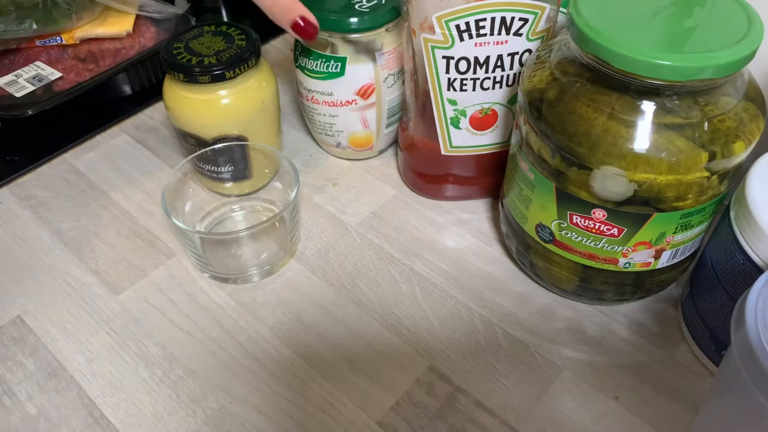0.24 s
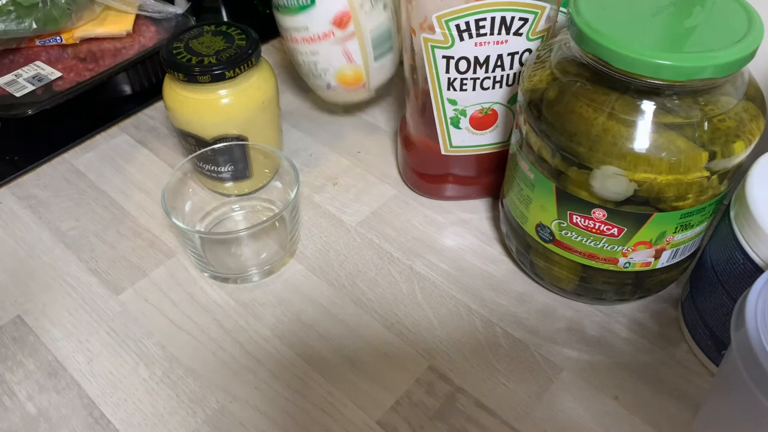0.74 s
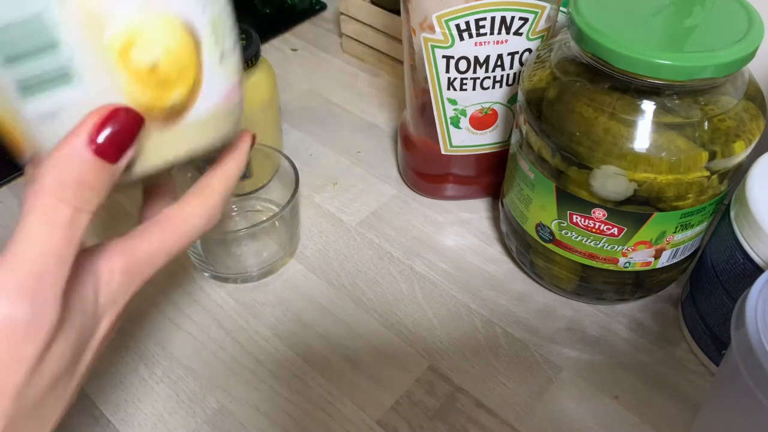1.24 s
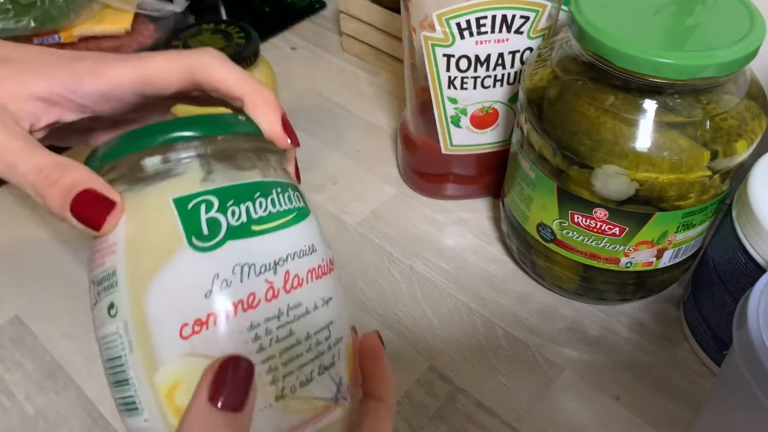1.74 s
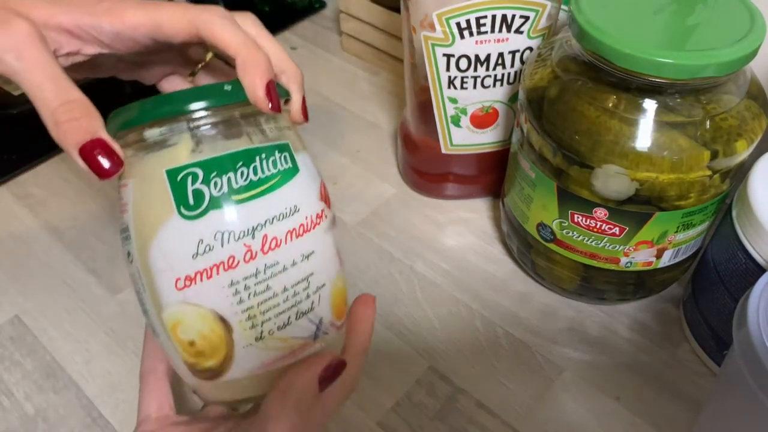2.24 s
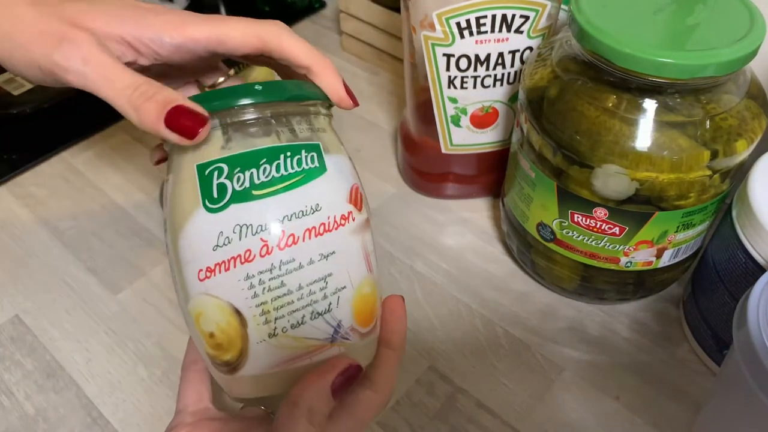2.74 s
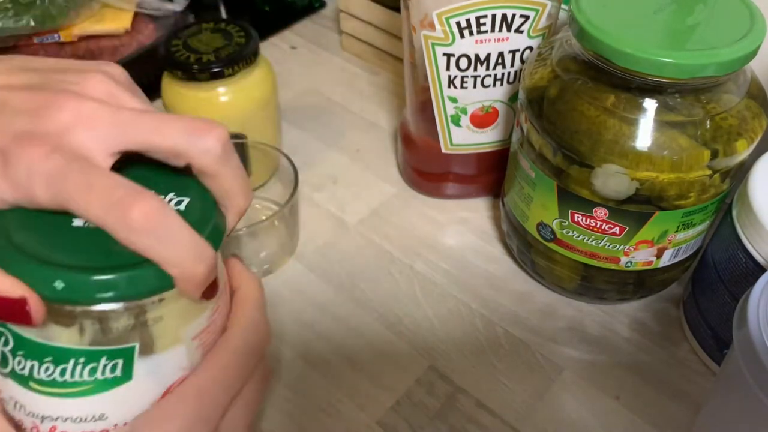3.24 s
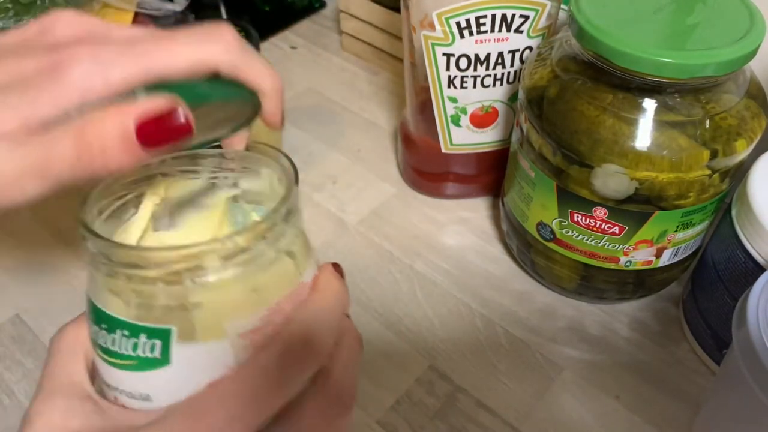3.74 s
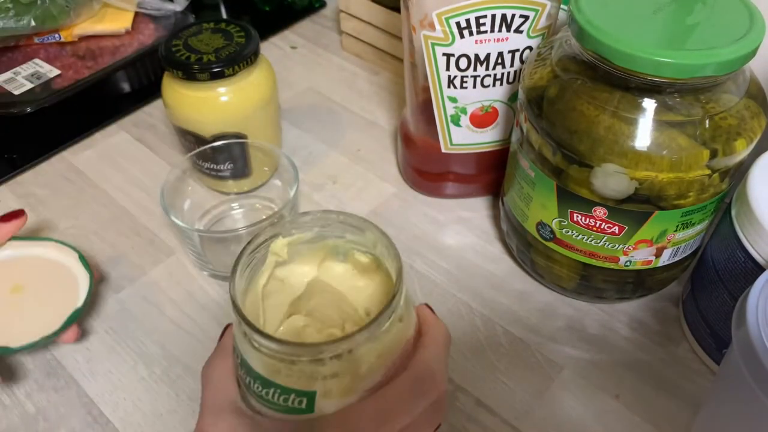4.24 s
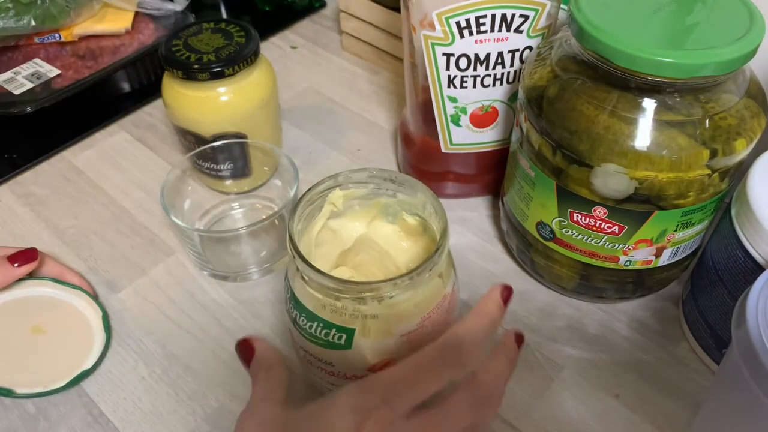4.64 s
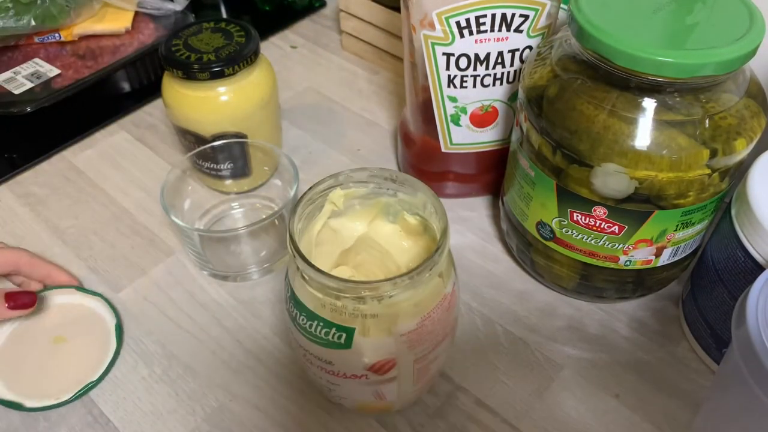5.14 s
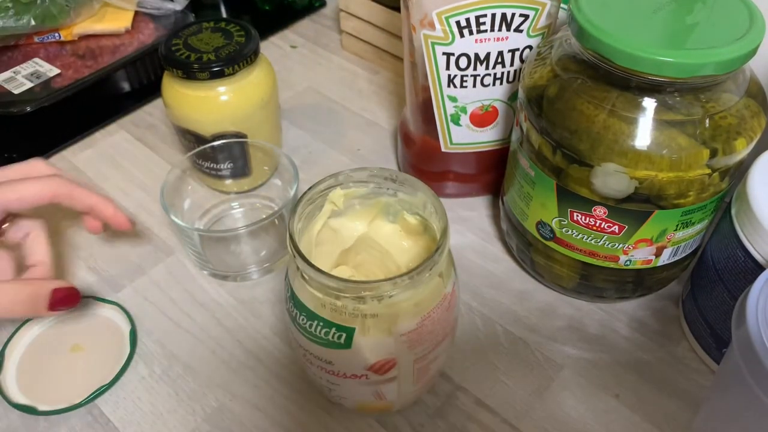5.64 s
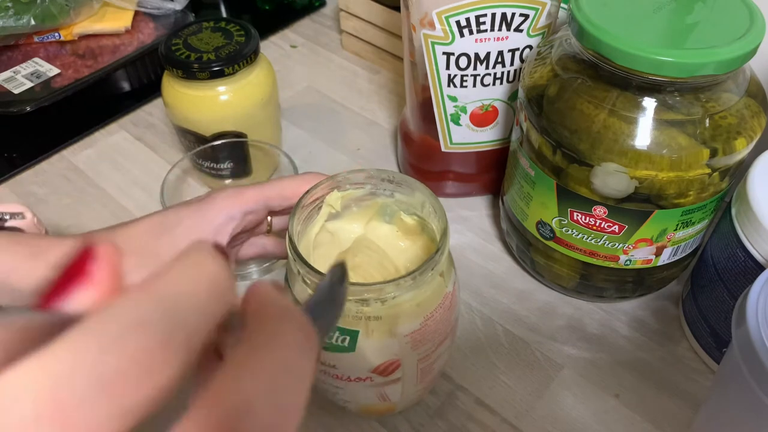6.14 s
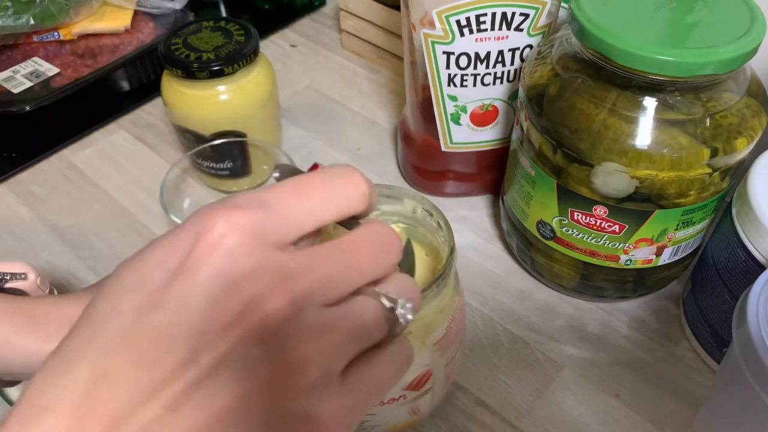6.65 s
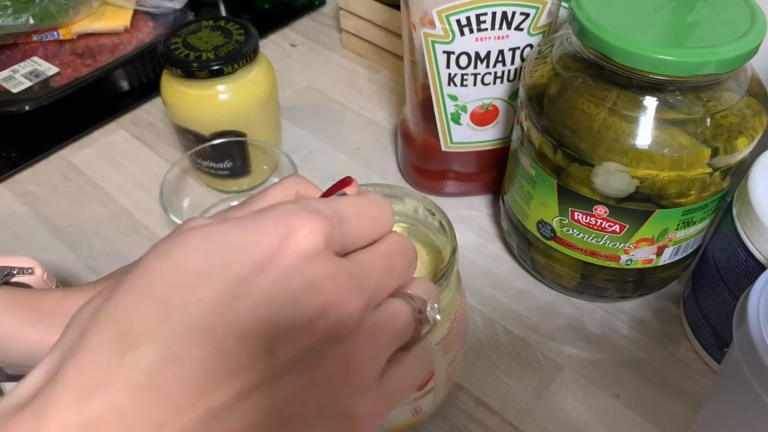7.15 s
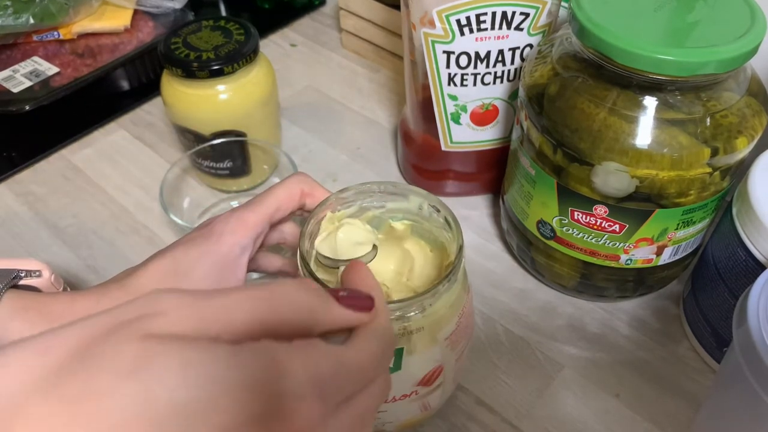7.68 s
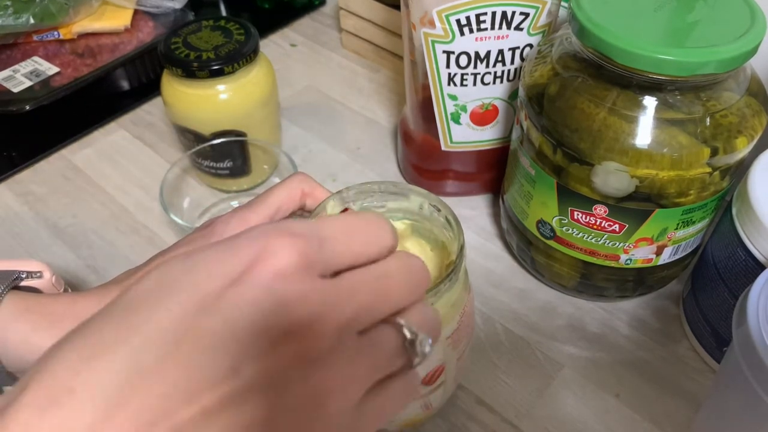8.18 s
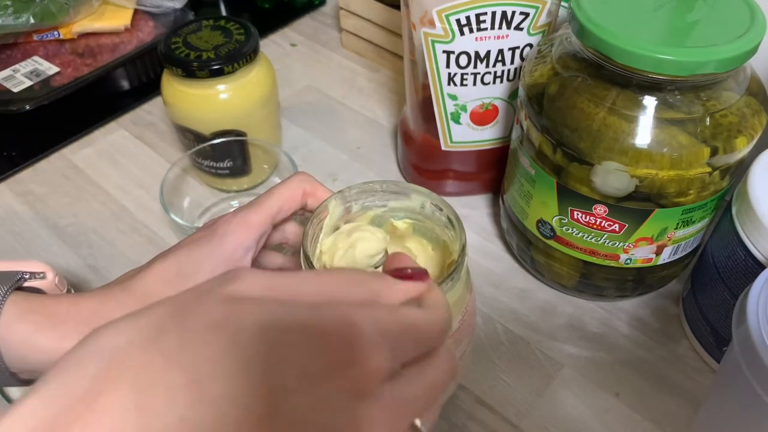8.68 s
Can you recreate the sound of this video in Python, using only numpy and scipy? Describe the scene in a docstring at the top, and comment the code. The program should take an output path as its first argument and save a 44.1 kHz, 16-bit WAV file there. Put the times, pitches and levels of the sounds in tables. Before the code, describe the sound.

In a quiet kitchen, nails tap glass, a metal lid snaps loose with a low pop, a heavy jar knocks down, and a spoon clinks.

```python
"""Over quiet dull room noise with faint low rumbles, fingernails tick on a closed glass jar and skin rubs glass
and lid: noise bursts with jar modes, and random slips. The lid pops open: snaps plus low decaying sines.
The jar knocks on the worktop and is dragged (board modes, stick-slip); the metal lid is laid down and pushed
aside (touches, rim scrape); the jar is dragged again. Last, a small spoon clinks on the glass: ticks plus
modes weighted by the place of contact."""
import sys
import numpy as np
from scipy import signal
from scipy.fft import rfft, irfft
from scipy.io import wavfile

SR = 44100
rng = np.random.default_rng(int(sys.argv[2]) if len(sys.argv) > 2 else 0)


def wav_out(sig):
    """Save sig, one row per channel (or a flat mono array), as 16-bit PCM at SR to the path in sys.argv[1]."""
    wavfile.write(sys.argv[1], SR, np.round(np.clip(np.atleast_2d(sig).T, -1, 1) * 32767).astype(np.int16))


N = 393151
TIME = np.arange(N) / SR
TAIL = TIME[:SR // 2]
# delay of the left channel
TREBLE_LAG_SAMPLES, WORKTOP_LAG_SAMPLES, SPOON_LAG_SAMPLES = 13, 5, 9


def amp(db):
    """Decibels to gain."""
    return 10 ** (np.asarray(db) / 20)


def unit(x):
    """Scale to an energy of one."""
    return x / np.sqrt(np.sum(x ** 2, axis=-1, keepdims=True) + 1e-20)


def at_hz(points, hz):
    """Read a curve on a log-frequency axis."""
    f, value = np.transpose(points)
    return np.interp(np.log(np.maximum(hz, 1)), np.log(f), value)


def through(x, response):
    """Convolve a sound with an impulse response."""
    return signal.oaconvolve(np.atleast_2d(x), np.atleast_2d(response), axes=1)[:, :x.shape[-1]]


def low_pass(x, hz, order=2):
    """Butterworth low-pass."""
    sos = signal.butter(order, hz, fs=SR, output="sos")
    return signal.sosfilt(sos, x + 1e-18)


def colour(spectrum, size=8192):
    """Causal impulse response of unit energy with the given spectrum shape, by folding the cepstrum."""
    level_db = at_hz(spectrum, np.fft.rfftfreq(size, 1 / SR))
    cepstrum = irfft(np.log(amp(level_db)))
    cepstrum[1:size // 2] *= 2
    cepstrum[size // 2 + 1:] = 0
    return unit(irfft(np.exp(rfft(cepstrum))))


def fade(t60_s):
    """Exponential decay, 60 dB down after t60."""
    return np.exp(-np.log(1000) * TAIL / t60_s)


def ringing(modes):
    """Damped sines of alternating sign, peak one."""
    out = np.zeros(len(TAIL))
    for k, (hz, db, t60_s) in enumerate(modes):
        out += (-1) ** k * amp(db) * fade(t60_s) * np.sin(2 * np.pi * hz * TAIL)
    return out / np.abs(out).max()


def shimmer(modes, split):
    """A nearly round body: each mode is split into close partials that beat; peak one."""
    partials = []
    for hz, db, t60_s in modes:
        for side in (-1, 0, 1):
            partial_hz = hz * (1 + split * (side + rng.uniform(-0.522, 0.55)))
            partial_db = db + rng.normal(0, 2) - 3 * abs(side)
            partials.append((partial_hz, partial_db, t60_s))
    return ringing(partials)


def build_up(tau_s):
    """Exponential approach to full level after contact."""
    return 1 - np.exp(-TAIL / tau_s)


def crack(response, t60_s, rise_tau_s):
    """A hard contact: a burst of dense vibration that builds up and quickly dies, peak about one."""
    burst = rng.standard_normal(len(TAIL)) * fade(t60_s) * build_up(rise_tau_s)
    return through(burst, response)[0] * 0.59


def add(track, s, sound):
    """Mix a sound into a track at a time."""
    start = round(s * SR)
    track[start:start + len(sound)] += sound[:N - start]


def freedom(db, rows, damping):
    """Light touches stay in contact and damp the ring; the hardest one bounces clear."""
    return amp(damping * (db - max(row[1] for row in rows)))


def blows(rows, spectrum, modes, *, crack_t60_s, rise_tau_s, ring_db, dull_hz):
    """Each blow is a crack plus the body's modes; fleshier contacts carry more of the low part."""
    out, response = np.zeros(N), colour(spectrum)
    for s, db, dull_db in rows:
        ring = freedom(db, rows, damping=0.27) * shimmer(modes, split=0.00678) * build_up(rise_tau_s)
        hit = crack(response, crack_t60_s, rise_tau_s) + amp(ring_db) * ring
        reweighted = hit + (amp(dull_db) - 1) * low_pass(hit, dull_hz, order=1)
        add(out, s, amp(db) * reweighted)
    return out


def slips(per_s, spread_db):
    """Friction: tiny random slips of uneven size, rms one."""
    happens = rng.random(N) < per_s / SR
    size = amp(spread_db * rng.uniform(-1.2, 1, N))
    clicks = happens * size * rng.choice([-1, 1], N)
    return unit(clicks) * np.sqrt(N)


def stroke(start_s, length_s, db, swell_db=0, *, attack_tau_s, release_tau_s):
    """Gain of a sliding motion: a rise, a hold that may swell or sag, and a release."""
    progress = np.clip((TIME - start_s) / length_s, 0, 1)
    before = (start_s - TIME) / attack_tau_s
    after = (TIME - start_s - length_s) / release_tau_s
    edges = np.exp(-np.clip(np.maximum(before, after), 0, 20))
    return amp(db + swell_db * (progress - .5)) * edges


def strokes(rows, attack_tau_s, release_tau_s):
    """Summed gain of several sliding motions."""
    return sum(stroke(*row, attack_tau_s=attack_tau_s, release_tau_s=release_tau_s) for row in rows)


# reverberation: f/Hz, t60/s
KITCHEN_DECAY = [(100, 0.27), (500, 0.37), (2000, .36), (6000, 0.32), (14000, 0.08)]
# small things nearby scatter little bass
SCATTER_ABOVE_HZ = 154


def kitchen(x, lag_samples, near_db, room_db, near_t60_s):
    """Direct sound, later on the left; a scatter from nearby jars and wall; then the room's tail."""
    delay = round(.003 * SR)
    edges_hz = [20, 300, 1200, 4000, 9000, 18000]
    tail = 0
    for low, high in zip(edges_hz, edges_hz[1:]):
        sos = signal.butter(2, [low, high], "band", fs=SR, output="sos")
        band = signal.sosfilt(sos, rng.standard_normal((2, len(TAIL))))
        tail = tail + band * fade(at_hz(KITCHEN_DECAY, np.sqrt(low * high)))
    near = rng.standard_normal((2, len(TAIL))) * fade(near_t60_s)
    near = near - low_pass(near, SCATTER_ABOVE_HZ, order=1)
    reflections = amp(near_db) * unit(near) + amp(room_db) * unit(tail)
    response = np.pad(reflections, [(0, 0), (delay, 0)])
    response[[0, 1], [lag_samples, 0]] += 1
    return through(x, response)


# air noise spectrum: f/Hz, level/dB
ROOM_TONE_COLOUR = [(25, -27), (48, -1.5), (100, -7), (123, -11.5), (153, -6.5), (190, -18), (300, -12),
                    (600, -22.5), (1050, -22), (2100, -31.5), (3200, -32), (5500, -48.5), (13700, -49),
                    (15000, -76)]
# left-right likeness: f/Hz, shared power (0..1)
ROOM_LIKENESS = [(60, 0.89), (150, 0.95), (350, 0.63), (800, 0.22), (2000, .05), (5000, .1), (10000, 0.99)]
# low rumble swells and dies away: t/s, length/s, level/dB
RUMBLES = [(0.033, 0.16, -45.5), (1.07, 0.037, -54)]


def room_tone():
    """Steady dull air noise, partly shared between channels by frequency, with low rumbles."""
    hz = np.fft.rfftfreq(N, 1 / SR)
    alike = np.clip(at_hz(ROOM_LIKENESS, hz), 0, 1)
    shared, left, right = rfft(rng.standard_normal((3, N)))
    late = np.exp(-2j * np.pi * hz * TREBLE_LAG_SAMPLES / SR * (hz > 3000))
    common = np.sqrt(alike) * np.array([shared * late, shared])
    separate = np.sqrt(1 - alike) * np.array([left, right])
    air = through(irfft(common + separate, N), colour(ROOM_TONE_COLOUR))
    rumble = through(rng.standard_normal(N), unit(ringing([(58.6, 0, 0.39)])))
    swells = strokes(RUMBLES, attack_tau_s=0.15, release_tau_s=0.14)
    return amp(-56) * air + swells * low_pass(rumble, 110)


# fingernail taps on the closed jar: t/s, level/dB, dull-part weight/dB
NAIL_TAPS = [(1.0955, -51, -24), (1.167, -49.5, -20), (1.1815, -44.5, -8), (1.5888, -30.5, 5.5),
             (1.6475, -45, 11), (1.949, -40.5, 7)]
# nail skids: t/s, ticks, first gap/s, gap growth per tick (ratio), level/dB, dull-part weight/dB
NAIL_SKIDS = [(1.35, 5, .015, 1.17, -23.5, 1), (1.7547, 4, .0195, 0.89, -26, 10)]
# loudest at the middle tick; per tick away from it: weaker, duller
SKID_FALL_DB, SKID_DULLING_DB = 6, 1


def nail_ticks():
    """Single taps, and skids unrolled into ticks: t/s, level/dB, dull-part weight/dB."""
    ticks = list(NAIL_TAPS)
    for s, count, gap_s, growth, db, dull_db in NAIL_SKIDS:
        for k in range(round(count)):
            away = abs(k - round(count) // 2)
            ticks.append((s, db - SKID_FALL_DB * away, dull_db + SKID_DULLING_DB * away))
            s = s + gap_s * growth ** k
    return ticks


# nail contact spectrum: f/Hz, level/dB
NAIL_COLOUR = [(400, 3.5), (780, -7), (1500, 7), (2350, 9), (3000, 4.5), (4000, 11.5), (4900, 5),
               (7500, 13), (9800, 20.5), (11500, 2), (13300, 18.5), (16000, 8)]
# closed jar modes: f/Hz, level/dB, t60/s
CLOSED_JAR_MODES = [(780, -3, 0.068), (2265, -14, 0.13), (3990, -10.5, 0.13), (5730, -15, 0.066),
                    (7620, 10, 0.021), (8440, -4, 0.083), (8950, -28, 0.084), (9730, 8.5, 0.039),
                    (12000, -24, 0.048), (13700, -1, 0.059)]
# skin slides over glass and lid: t/s, length/s, level/dB
SKIN_RUBS = [(1.256, 0.033, -69), (1.56, 0.047, -63.5), (1.93, 0.075, -64.5), (2.36, .04, -77.5),
             (2.955, 0.14, -57.5), (3.27, 0.085, -65.5)]
# skin friction spectrum: f/Hz, level/dB
RUB_COLOUR = [(2350, -20), (4800, -1), (5800, 3.5), (6400, -3), (8500, 4.5), (10200, 6), (11500, -4),
              (13200, 10), (14500, -6), (16000, 0.5)]


def hands():
    """Nails tick on the jar, and skin hisses over it in tiny slips."""
    ticks = amp(3) * blows(nail_ticks(), NAIL_COLOUR, CLOSED_JAR_MODES, crack_t60_s=0.017,
                           rise_tau_s=0.0017, ring_db=-11.5, dull_hz=4050)
    fine_grain = slips(per_s=2200, spread_db=-3.5)
    coarse_grain = amp(-9.5) * slips(per_s=140, spread_db=2.5)
    sliding = strokes(SKIN_RUBS, attack_tau_s=0.042, release_tau_s=.018)
    skin = sliding * through(fine_grain + coarse_grain, colour(RUB_COLOUR))[0]
    return kitchen(ticks + skin, TREBLE_LAG_SAMPLES, near_db=-1.5, room_db=-10.5, near_t60_s=0.012)


# lid lugs slip over the glass thread and let go: t/s, level/dB, dull-part weight/dB
LUG_SNAPS = [(3.4054, -28.5, -13), (3.4315, -16, -8), (3.4354, -31, -9), (3.4445, -10.5, -9),
             (3.4475, -30, -12), (3.5487, -35, -5), (3.565, -35, 11.5), (3.6167, -52.5, 16)]
# lug contact spectrum: f/Hz, level/dB
LUG_COLOUR = [(290, -24), (550, -2), (950, -1), (1400, 1.5), (2500, -6), (4200, -11.5), (6200, -7.5),
              (9500, -12), (13300, -17.5), (16000, -21.5)]
# open jar modes: f/Hz, level/dB, t60/s
OPEN_JAR_MODES = [(1490, -20.5, 0.29), (2456, 0, 0.09), (3800, -6, 0.16), (4640, 0, 0.063),
                  (5520, -3.5, 0.11), (6060, -6.5, 0.101), (6000, 2, 0.064), (8533, -24, 0.057),
                  (9905, -22, 0.19), (10380, -15, 0.08)]
# air gulps under the lid as the vacuum breaks: t/s, level/dB, f/Hz, t60/s
AIR_GULPS = [(3.4312, -32, 255, 0.037), (3.444, -13.5, 97.4, 0.085), (3.4441, -28.5, 337, 0.071),
             (3.4706, -26, 354, 0.06), (3.565, -40.5, 430, 0.045)]


def opening():
    """The lugs snap off the thread and air rushes in with a low pop of decaying sines."""
    snaps = blows(LUG_SNAPS, LUG_COLOUR, OPEN_JAR_MODES, crack_t60_s=0.016,
                  rise_tau_s=0.0005, ring_db=-24, dull_hz=3000)
    air = np.zeros(N)
    for s, db, hz, t60_s in AIR_GULPS:
        add(air, s, amp(db) * ringing([(hz, 0, t60_s)]))
    air = kitchen(low_pass(air, 1040), 0, near_db=-5, room_db=-14, near_t60_s=.05)
    balance_db = [[-1], [1]]  # left, right
    snaps = kitchen(snaps, TREBLE_LAG_SAMPLES, near_db=2.5, room_db=-12, near_t60_s=0.061)
    return air * amp(balance_db) + snaps


# moving slowly, as it stops or starts, the base catches: t/s, length/s, level/dB
BASE_CATCHES = [(4.513, .045, -33), (6.085, 0.015, -26)]
SHUDDER_HZ, SHUDDER_DB = 319.8, -20.5  # mean rate; level relative to the push


def shudder(push):
    """Nearly regular stick and slip of the jar's base, wandering in rate; strongest where the base catches."""
    wander = unit(low_pass(rng.standard_normal(N), 53.3)) * np.sqrt(N)
    caught = strokes(BASE_CATCHES, attack_tau_s=.007, release_tau_s=0.018)
    rate_hz = SHUDDER_HZ * (1 + 0.068 * wander)
    return (amp(SHUDDER_DB) * push + caught) * np.sin(2 * np.pi * np.cumsum(rate_hz) / SR)


# jar base knocks on the worktop: t/s, level/dB, glassy crack relative level/dB
KNOCKS = [(4.0302, -34.5, -12.5), (4.041, -1, -23), (4.066, -3, -23.5), (4.2245, -17.5, -27.5),
          (4.2378, -21, -41.5), (4.278, -25.5, -40.5), (4.325, -27.5, -40), (4.346, -19, -27),
          (4.433, -18, -30), (6.129, -24.5, -38), (6.207, -28, -32.5), (6.233, -30.5, -29.5)]
# worktop modes: f/Hz, level/dB, t60/s
WORKTOP_MODES = [(89.85, -24, .22), (118, -20.5, 0.13), (147, -20, 0.1462), (251.5, -24, 0.23),
                 (346.7, -14.5, 0.091), (437, -7.5, 0.043), (577, -2.5, 0.046), (858.6, 0, 0.025),
                 (918, -3.5, 0.019), (1050.4, -12.5, 0.028)]
# glassy crack spectrum: f/Hz, level/dB
CRACK_COLOUR = [(760, -20), (1300, -2), (1750, 3.5), (2100, -5.5), (3400, -14), (5500, -17), (9500, -26),
                (13000, -33), (16000, -39.5)]
# glass wall shaken from its base: f/Hz, level/dB, t60/s
JAR_WALL_MODES = [(1394, 2.5, 0.1), (1799, 1, 0.15), (4010, -8.5, 0.1412), (5365, -2, 0.16),
                  (6220, -7, 0.14), (8240, -1.5, 0.148), (9860, -0.5, 0.16)]
# jar pushed over the worktop: t/s, length/s, level/dB, swell start to end/dB
JAR_PUSHES = [(4.24, 0.26, -27, 10), (6.063, 0.038, -32.5, 3.5), (6.135, 0.12, -31.5, -10)]
# drag judder spectrum: f/Hz, level/dB
JUDDER_COLOUR = [(41, -39), (80, -17.5), (145, -4), (194, -13.5), (320, 6.5), (425, -4), (562, 3.5),
                 (690, -13.5), (876, -8), (1280, -37), (1700, -32.5), (5050, -64.5), (15000, -69)]
# glass base hiss spectrum: f/Hz, level/dB
BASE_HISS_COLOUR = [(800, 5), (2000, 7.5), (5000, -8.5), (10000, -9.5), (14000, -25.5), (16000, -18)]


def jar_on_worktop():
    """The heavy jar makes the worktop boom when it lands and judder when it is dragged."""
    boom, glass = np.zeros(N), np.zeros(N)
    board = low_pass(ringing(WORKTOP_MODES), 1150, order=6)
    bright = colour(CRACK_COLOUR)
    for s, db, crack_db in KNOCKS:
        wall = amp(-14) * freedom(db, KNOCKS, damping=.4) * shimmer(JAR_WALL_MODES, split=0.012)
        glassy = amp(1.5) * crack(bright, t60_s=0.09, rise_tau_s=0.000494) + wall
        add(boom, s, amp(db) * board)
        add(glass, s, amp(db + crack_db) * glassy)
    push = strokes(JAR_PUSHES, attack_tau_s=0.0056, release_tau_s=0.031)
    judder = through(slips(per_s=450, spread_db=3), colour(JUDDER_COLOUR))[0]
    drag = amp(-2.5) * push * judder + shudder(push)
    hiss = amp(-36.5) * push * through(rng.standard_normal(N), colour(BASE_HISS_COLOUR))[0]
    low = kitchen(boom + drag, WORKTOP_LAG_SAMPLES, near_db=-12, room_db=-16.5, near_t60_s=0.28)
    balance_db = [[-1.1], [1.1]]  # left, right
    high = kitchen(glass + hiss, TREBLE_LAG_SAMPLES, near_db=0, room_db=-9.5, near_t60_s=0.0514)
    return low * amp(balance_db) + high


# loose lid touches the worktop: t/s, level/dB, dull-part weight/dB
LID_TOUCHES = [(4.653, -31.5, -1.5), (4.666, -40.5, 4), (4.674, -38, 1), (5.118, -37.5, -3),
               (5.156, -32, -6.5), (5.163, -42.5, -1), (5.231, -38, 0.5)]
# lid modes: f/Hz, level/dB, t60/s (shorter in the scrape)
LID_MODES = [(894.3, -4, 0.13), (1590, -7, 0.25), (2240, -1, 0.17), (2606, -14, 0.28), (3093, 8.5, 0.088),
             (3930, -1.5, 0.22), (4145, -14, 0.17), (4530, -13, .14), (4880, 5.5, 0.15), (4965, 5, 0.11),
             (6150, -7, 0.21), (9109, -9, 0.2), (9500, -14, 0.22)]
# lid contact spectrum: f/Hz, level/dB
LID_COLOUR = [(240, -38), (450, -14.5), (839, 0), (1330, -1), (1870, 1.5), (3260, -4.5), (4000, -3.5),
              (5000, -4), (7060, -13.5), (10100, -14), (13500, -30), (16000, -35)]
# lid nudged along on its rim: t/s, length/s, level/dB
LID_NUDGES = [(5.013, 0.019, -59.5), (5.117, 0.022, -49.5), (5.178, 0.051, -41.5)]


def loose_lid():
    """The thin metal lid clatters down, then its rim scrapes and keeps it ringing."""
    touches = amp(6) * blows(LID_TOUCHES, LID_COLOUR, LID_MODES, crack_t60_s=0.043,
                             rise_tau_s=0.00026, ring_db=-9, dull_hz=3010)
    sliding = strokes(LID_NUDGES, attack_tau_s=0.012, release_tau_s=.005)
    grit = sliding * slips(per_s=2500, spread_db=10)
    short_ring = unit(shimmer(LID_MODES, split=.007) * fade(.15))
    ring = amp(-11) * through(grit, short_ring)[0]
    scrape = amp(-3) * through(grit, colour(LID_COLOUR))[0] + ring
    return kitchen(touches + scrape, TREBLE_LAG_SAMPLES, near_db=4, room_db=-9.5, near_t60_s=0.013)


# spoon against glass: t/s, level/dB, place of contact (0 bowl..1 stem)
CLINKS = [(7.118, -33.5, 0), (7.1222, -46.5, 0), (7.155, -48.5, 0), (7.2174, -54.5, 0.11), (7.465, -66, 0),
          (7.702, -24, 0.98), (7.719, -39.5, 0.95), (8.295, -62, .1), (8.309, -61, 0.73)]
# spoon and jar ringing together: f/Hz, level at bowl/dB, level at stem/dB, t60/s
SPOON_MODES = [(1850, -17, -4, .13), (2659, -30, -16, .18), (3620, -24, -16, .08), (4200, -11, -13, .08),
               (4540, -13, -2, .14), (4660, -15, -7, .13), (5416, -28, -10, .09), (5770, 0, -22, .07),
               (6110, -35, -2, .16), (6400, -30, -12, .13), (8700, -13, -16, .05), (10300, -15, -17, .045)]
# spoon contact spectrum: f/Hz, level/dB
SPOON_COLOUR = [(290, -31), (550, -5.5), (1400, -14.5), (1880, 9), (2400, -4), (3400, -10), (4500, 1.5),
                (5200, -13.5), (6100, 0), (7500, -7.5), (10200, -8), (13500, -21.5), (16000, -34)]
# the stem grazes the rim around the hardest clink, from shortly before it to shortly after
GRAZE_LEAD_S, GRAZE_S, GRAZE_DB = 0.0017, 0.0065, -38


def spoon():
    """The place of contact decides which modes of spoon and jar sound; the bowl gives the brighter tick."""
    response = colour(SPOON_COLOUR)
    hardest_s = max(CLINKS, key=lambda clink: clink[1])[0]
    graze = stroke(hardest_s - GRAZE_LEAD_S, GRAZE_S, GRAZE_DB, attack_tau_s=0.0056, release_tau_s=.009)
    out = through(graze * slips(per_s=2800, spread_db=1.5), response)[0]
    for s, db, place in CLINKS:
        modes = [(hz, bowl_db + place * (stem_db - bowl_db), t60_s)
                 for hz, bowl_db, stem_db, t60_s in SPOON_MODES]
        free = freedom(db, CLINKS, damping=.4)
        ring = free * shimmer(modes, split=0.0075) * build_up(0.00083)
        tick = crack(response, t60_s=0.035, rise_tau_s=0.00099)
        treble = tick - low_pass(tick, 11400, order=1)
        tick = tick + (1 - place) * amp(8.5) * treble
        add(out, s, amp(db) * (amp(1) * tick + amp(-2.5) * ring))
    return kitchen(out, SPOON_LAG_SAMPLES, near_db=-2, room_db=-14.5, near_t60_s=0.032)


def scene():
    """Everything on the worktop, over the room's own noise."""
    return room_tone() + hands() + opening() + jar_on_worktop() + loose_lid() + spoon()


CUTOFF_HZ = 16900  # stopband edge


def record(dry):
    """The microphone drops the deepest bass, peaks are clipped at 0.9 and the top is cut."""
    thinned = signal.sosfilt(signal.butter(3, 36, "high", fs=SR, output="sos"), dry)
    clipped = np.clip(thinned, -.9, .9)
    return signal.sosfilt(signal.cheby2(14, 70, CUTOFF_HZ, fs=SR, output="sos"), clipped)


dry = scene()
out = record(dry)
wav_out(out)
```